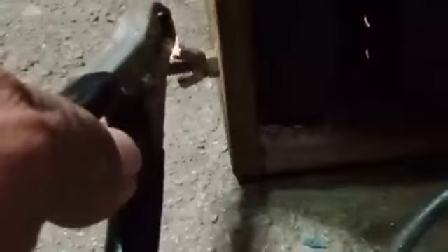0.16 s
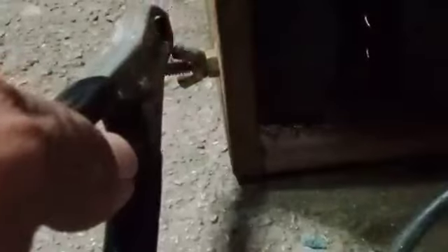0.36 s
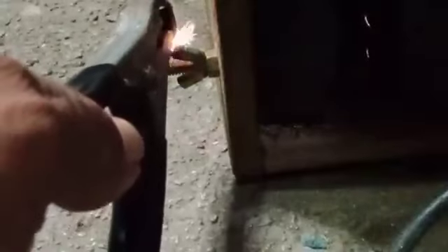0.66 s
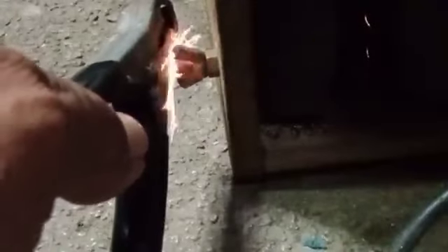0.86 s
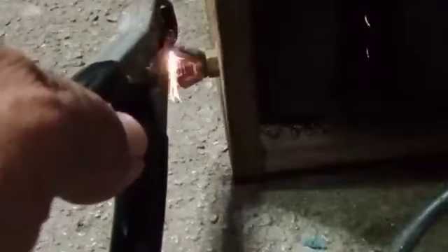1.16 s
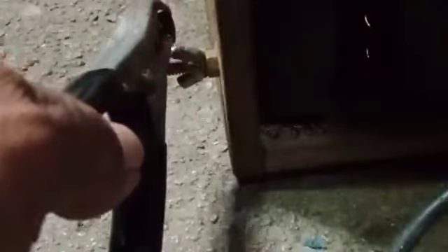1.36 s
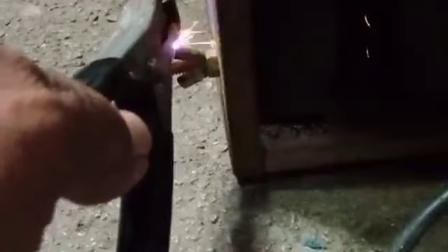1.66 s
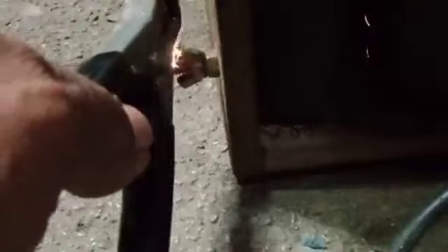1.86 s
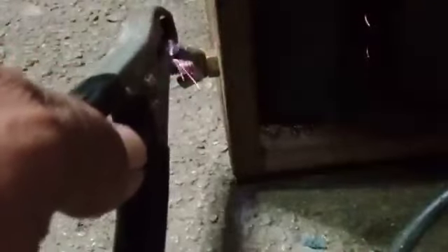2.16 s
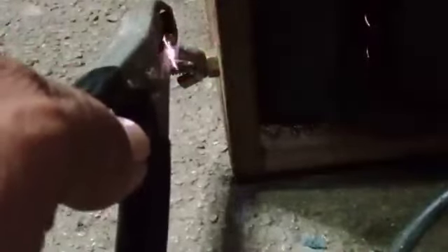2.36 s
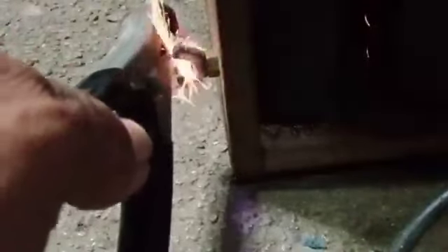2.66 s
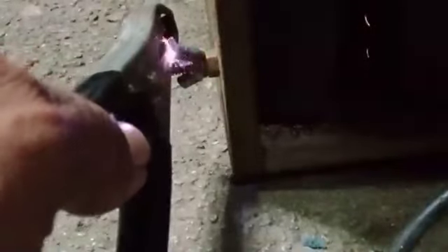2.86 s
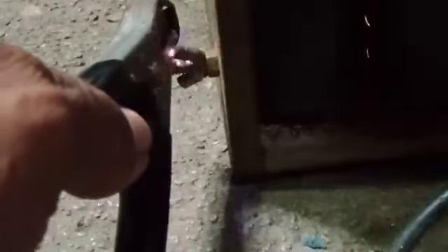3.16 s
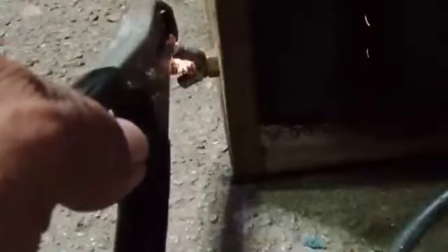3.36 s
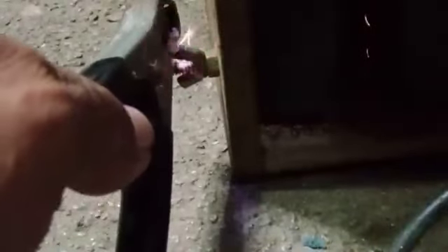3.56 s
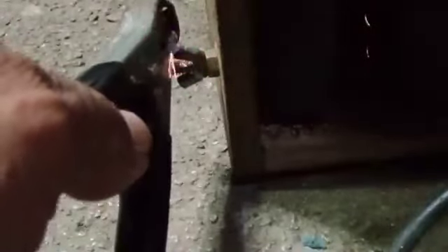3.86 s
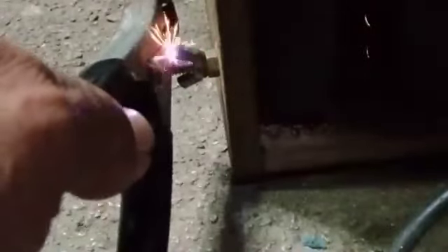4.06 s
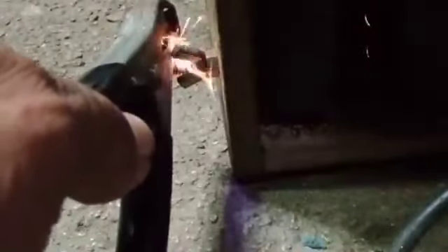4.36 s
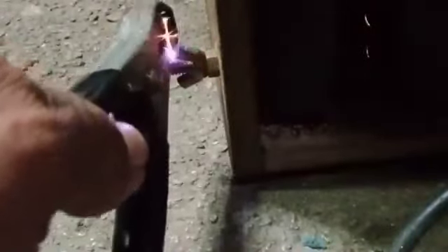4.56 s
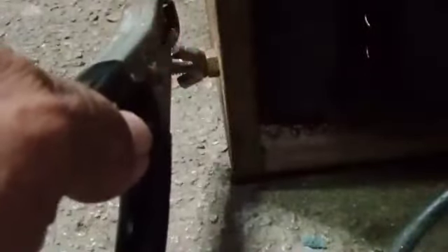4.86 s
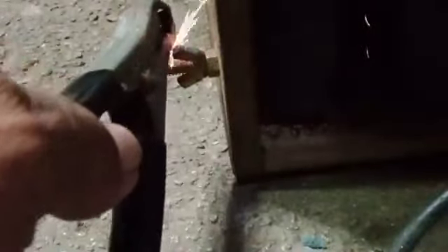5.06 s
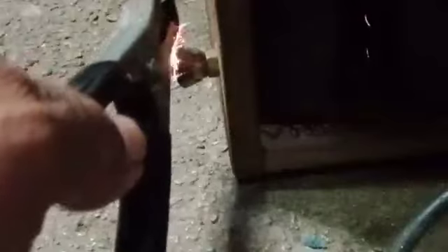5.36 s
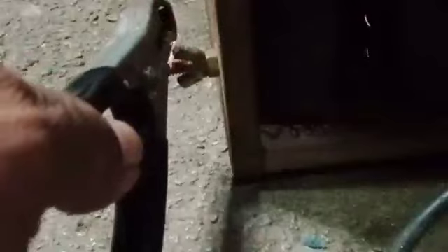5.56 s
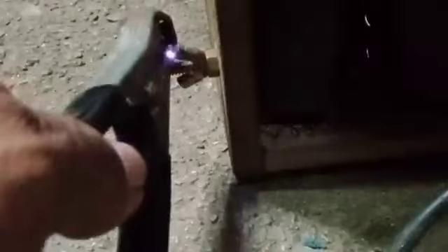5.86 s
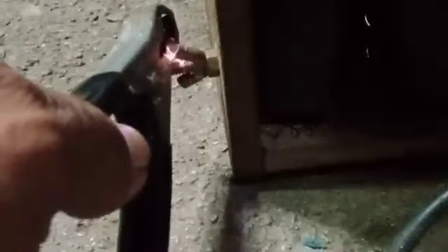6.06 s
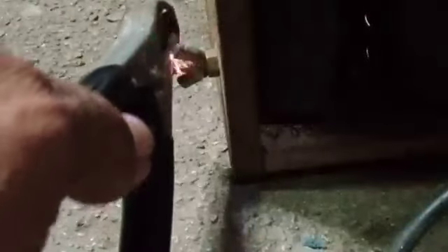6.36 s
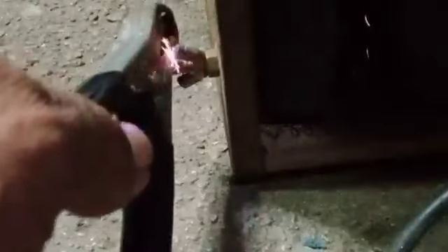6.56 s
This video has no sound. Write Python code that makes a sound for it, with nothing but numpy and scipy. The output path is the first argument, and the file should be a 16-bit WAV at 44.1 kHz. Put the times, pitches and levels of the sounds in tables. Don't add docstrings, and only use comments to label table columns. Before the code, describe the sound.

A harsh, raspy electric arc buzzes continuously at close range, with a bright metallic sizzle crackling on top and small flutters in strength.

```python
import sys
import numpy as np
from scipy import signal
from scipy.fft import rfft, irfft, next_fast_len
from scipy.io import wavfile
from scipy.ndimage import uniform_filter1d

SR = 44100
rng = np.random.default_rng(int(sys.argv[2]) if len(sys.argv) > 2 else 0)


def rack_gain(trim_db):
    fader = np.asarray(trim_db, float)
    return 10 ** (fader / 20)


def master_out(mix):
    frames = np.transpose(np.atleast_2d(mix))
    ceiling = np.clip(frames, -1, 1)
    pcm = np.round(ceiling * 32767).astype(np.int16)
    wavfile.write(sys.argv[1], SR, pcm)


N = 295822
TIME = np.arange(N) / SR
FREE_HZ = 334.52
SWEEP = 0.0142


def evened(x):
    return x / np.sqrt(np.mean(x ** 2) + 1e-20)


def read_curve(points, hz):
    point_hz, value = np.transpose(points)
    return np.interp(np.log(hz + 1), np.log(point_hz + 1), value)


def resonances(modes, hz):
    return sum(rack_gain(db) ** 2 / (1 + (2 * (hz - centre) / width) ** 2) ** 2 for centre, width, db in modes)


def ring_response(power):
    log_gain = 0.5 * np.log(np.concatenate([power, power[-2:0:-1]]) + 1e-10)
    minimum_phase = -signal.hilbert(log_gain).imag
    return np.fft.ifft(np.exp(log_gain + 1j * minimum_phase)).real[:len(power)]


def drift(top_hz):
    lowpass = signal.butter(2, top_hz, fs=SR, output="sos")
    return evened(signal.sosfilt(lowpass, rng.standard_normal(N)))


def bumps(rows):
    t = np.arange(0, N, 32) / SR
    total = sum(height * np.exp(-0.5 * ((t - s) / half) ** 2) for s, height, half in rows)
    return np.interp(TIME, t, total)


def add(mix, s, sound):
    part = mix[round(s * SR):][:len(sound)]
    part += sound[:len(part)]


# (frequency [Hz], level [dB per Hz])
RUMBLE_COLOUR = [(20, -9.5), (45, -13), (130, -9), (230, -7.5), (300, 0.5), (370, -1.5), (415, -15),
                 (465, -27), (540, -14), (700, -13), (870, -8), (1000, -3), (1100, -1), (1400, -40)]
# (time [s], change [dB], half length [s])
GUSTS = [
    (.24, 3.5, 0.14),
    (.95, 3, 0.22),
    (2.2, 7.5, 0.094),
    (2.7, 1.5, 0.24),
    (4.07, 5, 0.097),
    (4.6, -3, 0.21),
    (5.12, 2.5, 0.094),
]


def outdoors(level_db=-66.7, patch_db=4.1):
    frames, hz = N // 512 + 5, np.fft.rfftfreq(2048, 1 / SR)
    real, imag, patches = rng.standard_normal((frames, 1025, 3)).T
    patches = uniform_filter1d(patches, 8, 0)
    patches = evened(uniform_filter1d(patches, 5, 1))
    gain = rack_gain(read_curve(RUMBLE_COLOUR, hz)[:, None] + patch_db * patches) * (hz < 1500)[:, None]
    rumble = signal.istft((real + 1j * imag) * gain, nperseg=2048, noverlap=1536)[1][:N]
    return rack_gain(level_db + bumps(GUSTS)) * evened(rumble)


# (time [s], peak level [dB], pitch [Hz], length [s])
KNOCKS = [(0.535, -46, 720, 0.056), (0.716, -50.5, 680, 0.055), (0.808, -57, 675, 0.05),
          (1.046, -51, 683, 0.039), (1.157, -61, 637, 0.04), (1.29, -62, 663, 0.055),
          (1.452, -51.5, 760, 0.033), (1.615, -59, 770, 0.05), (1.734, -51, 731.4, 0.037),
          (2.174, -51, 683, 0.062), (2.33, -54, 653, 0.054), (2.643, -57, 603.6, 0.054),
          (3.88, -62, 778, 0.05), (4.816, -61.5, 680, 0.047), (4.988, -53, 875, 0.039),
          (5.2, -49, 683.5, 0.053), (5.265, -60, 672, 0.047), (5.551, -56, 737, 0.044),
          (5.624, -55, 719, 0.056), (6.327, -49, 710, 0.056)]


def far_knocks():
    out = np.zeros(N)
    for s, db, hz, length in KNOCKS:
        noise = rng.standard_normal(6000)[:round(length * SR) + 400]
        band = signal.butter(4, [hz - 70, hz + 70], "band", fs=SR, output="sos")
        hoot = evened(signal.sosfilt(band, noise)) * np.hanning(len(noise))
        add(out, s - 0.012, rack_gain(db - 6.5) * hoot)
    return out


# (time [s], peak level [dB], centre [Hz])
TICKS = [
    (0.146, -30.5, 650),
    (0.355, -35, 646),
]


def handling_ticks():
    out, t = np.zeros(N), np.arange(-100, 100) / SR
    for s, db, hz in TICKS:
        add(out, s, rack_gain(db) * np.cos(2 * np.pi * hz * t + 0.7) * np.exp(-(t * hz * 2.5) ** 2))
    return out


# (time [s], level [dB])
PRESSURE = [(0.0, -39.5), (0.8, -42), (0.97, -39), (1.4, -41.5), (1.66, -39.5), (2.11, -42), (2.22, -36.5),
            (2.35, -39), (2.67, -39.5), (3.02, -42.5), (3.11, -39.5), (3.38, -41), (4.11, -40),
            (4.66, -42.5), (4.85, -40.5), (6.7, -42)]


def hand_pressure():
    return np.interp(TIME, *np.transpose(PRESSURE))


# (time [s], change [dB], half length [s])
FLARES = [(0.264, -4.1, 0.012), (0.509, 0.5, 0.012), (0.758, 1.5, 0.04), (1.112, 3.5, 0.011),
          (1.287, 0.5, 0.012), (1.402, 4.5, 0.0087), (1.482, -3.5, 0.032), (1.686, 1, 0.033),
          (1.881, -6, 0.0092), (2.075, 0.5, 0.033), (2.26, -0.5, 0.061), (2.464, -1, 0.054),
          (2.574, 3.9, 0.0089), (2.933, -3, 0.035), (3.063, 4.5, 0.0096), (3.327, -1.5, 0.051),
          (3.492, -6.0, 0.018), (3.737, -7, 0.01), (3.901, -1.5, 0.064), (4.225, -1.5, 0.05),
          (4.39, -1.5, 0.044), (4.829, 2.5, 0.0096), (4.904, -3, 0.014), (5.303, 2, 0.011),
          (5.917, 2, 0.071), (6.116, -3, 0.012), (6.296, 4.5, 0.033), (6.565, 2.5, 0.03)]


def arc_flares(flutter_db=1.8, flutter_hz=22.3):
    return bumps(FLARES) + flutter_db * drift(flutter_hz)


# (time [s], slowing [Hz], half length [s])
DRAGS = [(.041, 3.5, 0.034), (.634, 4.5, .04), (.998, 5, 0.024), (1.402, 6.5, 0.061), (1.703, 4, 0.072),
         (2.616, 4.5, .016), (2.759, 8, 0.04), (3.612, 2, 0.04), (4.021, 5, 0.034), (4.236, 2.5, 0.067),
         (4.397, 10.5, 0.027), (4.947, -4, 0.017), (6.28, 10.5, 0.038), (6.619, 2, .036)]
# (time [s], slowing [Hz])
SNAGS = [(.733, 6), (0.789, 7), (1.114, 6), (1.182, 9), (1.944, 8), (2.022, 5.5), (2.083, 5), (2.147, 5.5),
         (2.262, 8), (2.274, 12), (2.562, 12), (2.779, -8), (2.801, 8), (2.832, -7), (2.883, 7),
         (3.097, 12), (3.168, 11), (3.43, 14), (3.692, 13), (3.767, 9.5), (4.0, 5), (5.301, 10), (5.334, 7),
         (5.496, 8), (5.852, 10.5), (5.894, 9), (6.268, -6.5), (6.448, 10), (6.692, 18.5)]


def contact_sag(snag_s=0.007):
    return bumps(DRAGS) + bumps([(s, hz, snag_s) for s, hz in SNAGS])


# (start [s], end [s], edge [s], rate gain [Hz], buzz gain [dB], spark loss [dB])
SURGE = (2.18, 2.254, .004, 8.5, 1.08, 3)


def gap_surge():
    start, end, edge, rise_hz, gain_db, loss_db = SURGE
    is_open = (np.tanh((TIME - start) / edge) - np.tanh((TIME - end) / edge)) / 2
    return rise_hz * is_open, gain_db * is_open, loss_db * is_open


def contact_cycles(hz, roam_hz=0.9, wander_hz=1.0, catch_hz=2.5):
    catches = np.maximum(drift(60) - 1.1, 0)
    rate = hz + roam_hz * drift(9) + wander_hz * drift(120) - catch_hz * catches
    return np.cumsum(rate) / SR


def ground_echo(x, echo_s=0.0016, echo_db=-8, t60=0.22, tail_db=-12):
    t = np.arange(8000) / SR
    bounces = rng.choice([-1., 1.], len(t)) * (rng.random(len(t)) < 2000 / SR)
    tail = bounces * rack_gain(-60 * t / t60) * (t > 0.002)
    tail = rack_gain(tail_db) * tail / np.linalg.norm(tail)
    tail[round(echo_s * SR)] += rack_gain(echo_db)
    return x + signal.oaconvolve(x, tail)[:N]


def discharge(turns, centre, spread, per_s, size_db):
    strike = rack_gain(size_db * rng.standard_normal(4000))[turns.astype(int)]
    from_centre = (turns - centre + 0.5) % 1 - 0.5
    window = np.exp(-0.5 * (from_centre / spread) ** 2)
    return strike * rng.choice([-1., 1.], N) * (rng.random(N) < per_s / SR * window)


# (frequency [Hz], width [Hz], level [dB])
SIZZLE_RINGS = [(5410, 97, -2.5), (5690, 190, -0.5), (5830, 150, -7), (6492, 85, 6.5), (6830, 86, -4),
                (7280, 105, -2.5), (7774, 310, -3.5), (8200, 260, -9.5), (8840, 600, -11),
                (10150, 460, -11), (10910, 240, -13), (11650, 220, -18.5), (12280, 240, -14),
                (12400, 660, -19), (14600, 250, -25), (15850, 450, -22.5)]
# (frequency [Hz], level [dB])
SIZZLE_BED = [(4500, -40), (5800, -11), (7500, -12.5), (9500, -19.5), (12500, -25.5), (13800, -24),
              (15400, -13.5)]


def sizzle(turns, shift=0.0072, flash_db=-11, tilt_db=9):
    hz = np.fft.rfftfreq(4096, 1 / SR)
    crackle = evened(discharge(turns, 0.6, 0.35, 20000, 0.17))
    flash = evened(discharge(turns, 0.62, 0.032, 16000, 0.79))
    turn = np.pi / 4 * (1 + np.tanh((TIME - 4.3) / 0.6))
    out = np.zeros(N)
    for grip, share in ((1 - shift, np.cos(turn)), (1 + shift, np.sin(turn))):
        bed = rack_gain(read_curve(SIZZLE_BED, hz)) ** 2 * (hz > 3000)
        colour = resonances(SIZZLE_RINGS, hz * grip) + bed
        bright = colour * rack_gain(flash_db + tilt_db * np.log2((hz + 1) / 8000)) ** 2
        out += share * ground_echo(signal.oaconvolve(crackle, ring_response(colour))[:N])
        out += share * signal.oaconvolve(flash, ring_response(bright))[:N]
    return evened(out)


# (frequency [Hz], level [dB])
SPARK_COLOUR = [(900, -58), (1150, -33.5), (1480, -15), (1760, -19.5), (1880, -10.5), (2150, -3.5),
                (2480, -14.5), (2800, -12), (3130, -19), (3520, 0.5), (3850, 5.5), (4150, -8), (4520, -9.5),
                (5200, -44)]
# (frequency [Hz], width [Hz], level [dB])
PART_RINGS = [(1272, 55, -20.5), (1823, 38, -8), (1935, 110, -18.5), (2053, 147, -5), (2540, 195, -6),
              (3061, 177, -2), (3212, 37, 2), (3705, 205, 0.5), (3995, 195, 5), (3890, 60, 2),
              (4290, 21, -30), (5050, 73, -19)]


def spark(turns, at=0.88, jitter=0.11, chatter=1.0, surge_db=0.16):
    size, late = rng.uniform(-1, 1, (4000, 2)).T
    moment = np.interp(np.arange(4000) + at + jitter * late, turns, np.arange(N), right=N).astype(int)
    cracks = np.bincount(moment, size, N + 1)[:N]
    drive = evened(cracks) + chatter * evened(discharge(turns, at, 0.24, 7000, 1.0))

    hz = np.fft.rfftfreq(4096, 1 / SR)
    low_skirt_db = -30 * np.maximum(np.log2(900 / (hz + 1)), 0)
    high_skirt_db = -60 * np.maximum(np.log2((hz + 1) / 5200), 0)
    broad = rack_gain(read_curve(SPARK_COLOUR, hz) - 6) * rack_gain(low_skirt_db + high_skirt_db)
    colour = broad ** 2 + resonances(PART_RINGS, hz) * rack_gain(-11.5)
    rung = signal.oaconvolve(drive * rack_gain(surge_db * drift(34)), ring_response(colour))[:N]

    size_fft = next_fast_len(N)
    multiple = np.fft.rfftfreq(size_fft, 1 / SR) * N / SR / turns[-1]
    lead = np.exp(2j * np.pi * SWEEP * multiple ** 2)
    return evened(irfft(rfft(rung, size_fft) * lead, size_fft)[:N])


# (multiple of the contact rate, level [dB])
PARTIALS = [(1, -29.5), (2, -55), (3, -44.5), (4, -12), (5, -14), (6, -11.5), (7, -3), (8, -7), (9, -0.5),
            (10, 1.5), (11, 2.5), (12, -4), (13, -2), (14, -18), (15, -25), (16, -24.5), (17, -31),
            (18, -24.5), (19, -27), (20, -25.5)]
# (multiple, change [dB per Hz slower], change [dB per Hz faster])
FLANKS = [(4, -0.02, -0.1), (5, -0.16, -.1), (6, .5, 0.76), (7, -0.26, 0.18), (8, -0.23, -0.9),
          (9, -0.56, 0.26), (10, -0.18, -0.24), (11, -0.36, -0.23), (12, 0.67, -1.47), (13, -.55, -1),
          (14, 0.36, -0.8)]


def blow(turns, waver_db=0.14, bounce_at=0.4048, weak_db=7.0, hum_db=0.86):
    out, at = np.zeros(N), np.arange(0, N, 64)
    rate = uniform_filter1d(np.gradient(turns[at]) * SR / 64, size=7) - FREE_HZ
    flanks = {k: down * np.maximum(-rate, 0) + up * np.maximum(rate, 0) for k, down, up in FLANKS}
    for k, db in PARTIALS:
        moved_db = np.interp(np.arange(N), at, flanks.get(k, 0 * rate))
        rebound = np.angle(1 + 0.6 * np.exp(-2j * np.pi * k * bounce_at))
        if k in (2, 3):
            flicker_db = weak_db * drift(15.0)
        else:
            flicker_db = waver_db * k * drift(36)
        if k == 1:
            flicker_db = flicker_db + hum_db * drift(45)
        phase = 2 * np.pi * (k * turns + SWEEP * k * k) + rebound
        out += rack_gain(db + flicker_db + moved_db) * np.cos(phase)
    return evened(out)


def scene():
    pressure_db, flare_db, sag_hz = hand_pressure(), arc_flares(), contact_sag()
    surge_hz, surge_gain_db, surge_loss_db = gap_surge()
    turns = contact_cycles(FREE_HZ - sag_hz + surge_hz)

    share = rack_gain(-1.5 + 1.58 * flare_db + 0.06 * sag_hz - surge_loss_db)
    buzz = (blow(turns) + share * evened(ground_echo(spark(turns)))) / np.sqrt(1 + share ** 2)
    buzz_db = -17.5 + 0.54 * (pressure_db - pressure_db.mean()) + 0.32 * flare_db
    buzz_db = buzz_db + surge_gain_db - 0.15 * drift(140)

    hiss = rack_gain(pressure_db + 0.4 + 0.2 * flare_db) * sizzle(turns)
    background = outdoors() + far_knocks() + handling_ticks()
    return (background + hiss + rack_gain(buzz_db) * buzz)[None]


def roll_off(x):
    return signal.sosfilt(signal.butter(12, 15390, fs=SR, output="sos"), x)


def record(dry):
    return roll_off(dry)


dry = scene()
out = record(dry)
master_out(out)
```